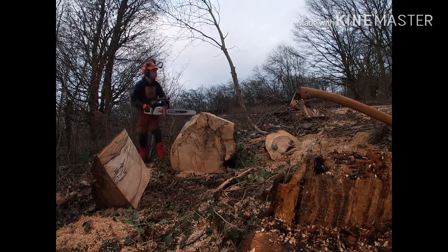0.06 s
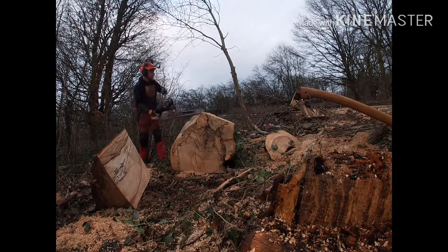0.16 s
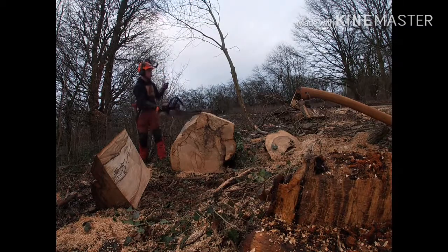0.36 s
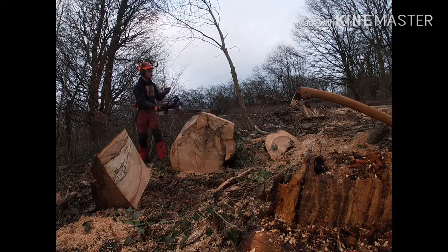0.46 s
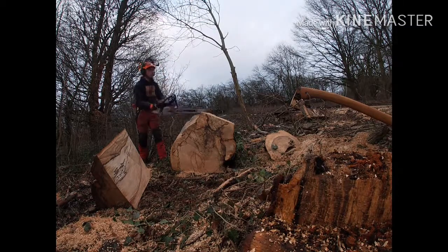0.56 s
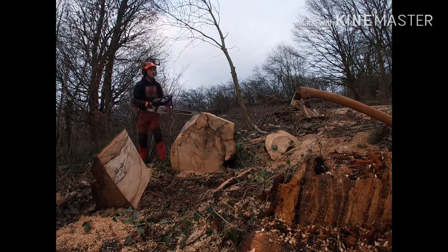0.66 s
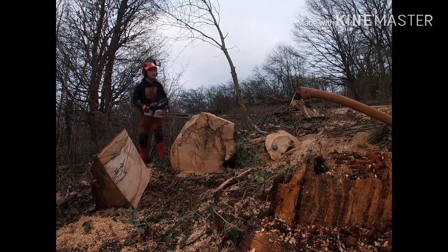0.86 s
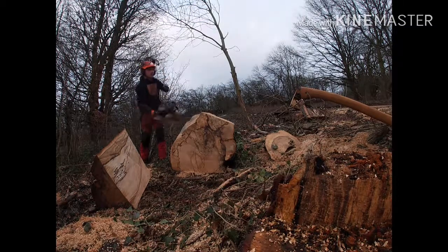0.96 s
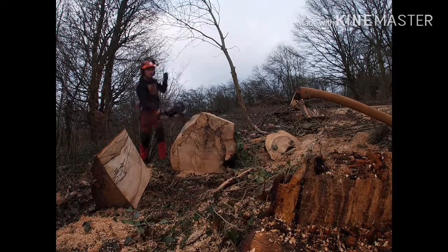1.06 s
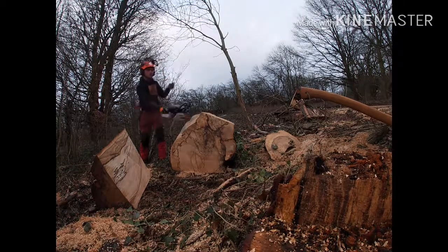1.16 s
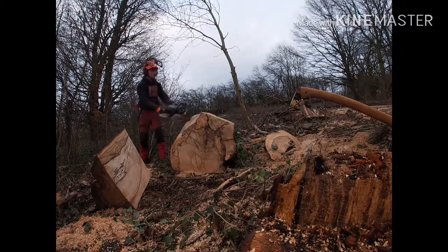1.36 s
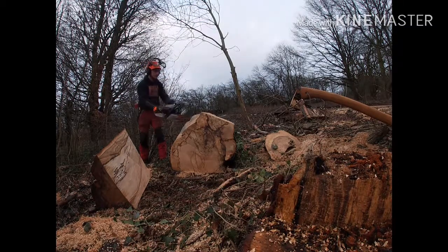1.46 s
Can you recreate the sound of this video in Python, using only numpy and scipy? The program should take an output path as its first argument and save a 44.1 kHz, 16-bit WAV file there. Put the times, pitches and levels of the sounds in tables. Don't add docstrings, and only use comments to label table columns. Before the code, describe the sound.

A cold chainsaw is pull-started twice in a woodland clearing. Light ratchet ticks come first over wind rumble and distant hush. At 0.28 s metal pawls clack, followed by about five low, airy piston chuffs and cord scrapes, then a grip knock at 0.45. Dull bumps and ticks fill 0.57-1.03. A harder pull clacks at 1.09, chuffs again, and the grip slams at 1.27; no ignition, small settling bumps.

```python
import sys
import numpy as np
from scipy import signal
from scipy.io import wavfile

SR = 44100
rng = np.random.default_rng(int(sys.argv[2]) if len(sys.argv) > 2 else 0)


def master(y):
    cut = np.clip(np.atleast_2d(y).T, -1, 1)
    pcm = np.round(cut * 32767)
    wavfile.write(sys.argv[1], SR, pcm.astype(np.int16))


def elevation(decibels):
    levels = np.asarray(decibels, float)
    return 10 ** (levels / 20)


N = 66150


def rms_one(x):
    return x / np.sqrt(np.mean(x ** 2) + 1e-20)


def curve(rows):
    return np.interp(np.arange(N) / SR, *np.transpose(rows))


def drift(rate):
    r = np.exp(-2 * np.pi * rate / SR)
    wander = signal.lfilter([1], [1, -2 * r, r * r], rng.standard_normal(N + SR))
    return rms_one(wander[SR:])


def ring(clicks, hz, t60):
    r, w = elevation(-60 / (t60 * SR)), 2 * np.pi * hz / SR
    return signal.lfilter([0, np.sin(w)], [1, -2 * r * np.cos(w), r * r], clicks + 1e-18)


def clicks_at(s, db):
    out = np.zeros(N)
    np.add.at(out, (np.asarray(s) * SR).astype(int), elevation(np.asarray(db)))
    return out


def soften(x, hz):
    r = np.exp(-2 * np.pi * hz / SR)
    return signal.lfilter([(1 - r) ** 2], [1, -2 * r, r * r], x)


def thin(x, hz):
    return signal.sosfilt(signal.butter(2, hz, "high", fs=SR, output="sos"), x)


def coloured(spectrum, patchy_db, rate):
    hz, db = np.transpose(spectrum)
    edges = hz[0] * 2 ** np.arange(0, np.log2(hz[-1] / hz[0]), 1 / 3)
    edges = np.append(edges, hz[-1])
    white = rng.standard_normal((2, N + SR // 2))
    out = 0
    for k, (low, high) in enumerate(zip(edges, edges[1:])):
        band_pass = signal.butter(3, [low, high + 1], "band", fs=SR, output="sos")
        band = signal.sosfilt(band_pass, white[k % 2])[-N:]
        band_db = np.interp(np.log(low * high) / 2, np.log(hz), db)
        out = out + band * elevation(band_db + patchy_db * drift(rate))
    return rms_one(out)


def rattle(rows, modes):
    contacts_per_s = 2500
    out, t = np.zeros(N + 4000), np.arange(4000) / SR
    for s, length, db in rows:
        swell = np.sin(np.pi * np.clip(t / length, 0, 1) ** 0.81) ** 2
        touches = swell * (rng.random(t.size) < contacts_per_s / SR)
        for hz, mode_db, t60 in modes:
            blows = soften(touches * rng.normal(0, 1, t.size), hz)
            rung = ring(blows, hz, t60)
            level = elevation(db + mode_db + rng.normal(0, 1.2))
            out[int(s * SR):][:t.size] += level * rung / (np.abs(rung).max() + 1e-12)
    return out[:N]


# [f/Hz, level/dB per Hz]
HUSH_COLOUR = [(300, 0), (420, -5), (763, 1), (1570, -5), (3730, -23.5), (6000, -36), (8000, -49),
               (14000, -74.5)]
# [t/s, level/dB]
HUSH_SWELL = [(0.0, -38), (0.324, -36), (0.458, -42), (0.71, -39), (1.09, -37), (1.5, -40.5)]
# [f/Hz, level/dB per Hz]
FIZZ_COLOUR = [(7000, 0), (9000, -1.5), (11500, -3), (13200, -7.5)]
# [t/s, level/dB]
FIZZ_SWELL = [(0, -73.5), (.3, -77.5), (.76, -82.5), (.82, -94), (1.03, -95.5), (1.1, -81), (1.38, -85),
              (1.45, -97)]


def distant_hush():
    body = elevation(curve(HUSH_SWELL) + 0.5) * coloured(HUSH_COLOUR, patchy_db=0.76, rate=18)
    fizz = elevation(curve(FIZZ_SWELL)) * coloured(FIZZ_COLOUR, patchy_db=-3, rate=30)
    return body + fizz


# [f/Hz, level/dB per Hz]
WIND_COLOUR = [(22, -15), (35, -6), (60, 1), (90, -8.5), (115, -6)]
# [t/s, level/dB]
GUST_SWELL = [(0, -36), (.11, -34.5), (.14, -31), (.17, -37), (.24, -30), (.3, -31), (.45, -40.5),
              (.53, -43), (.57, -35), (.635, -31), (.665, -35.5), (.705, -24), (.74, -36), (.9, -34.5),
              (1.05, -38), (1.2, -38), (1.35, -39.5), (1.5, -31)]
# [f/Hz, level/dB per Hz]
RUMBLE_COLOUR = [(110, -6), (140, -6), (175, 1), (216, -8), (260, -13), (320, -19)]


def wind_on_microphone():
    gusts = elevation(curve(GUST_SWELL)) * coloured(WIND_COLOUR, patchy_db=4.0, rate=9.8)
    rumble = elevation(-35) * coloured(RUMBLE_COLOUR, patchy_db=2.5, rate=4.7)
    return gusts + rumble


# [delay t/s, level/dB]
ECHO_PATHS = [
    (.012, -15.5),
    (.031, -17.5),
    (.057, -19.5),
]


def clearing_echoes(saw):
    dull = soften(saw, 2900)
    return sum(elevation(db) * np.pad(dull, (int(s * SR), 0))[:N] for s, db in ECHO_PATHS)


# [t/s, length t/s, level/dB]
TICK_EVENTS = [(.006, 0.0026, -51), (.022, 0.0034, -46.5), (.058, 0.0041, -49), (.147, 0.0061, -48.5),
               (.225, 0.0042, -47), (.606, 0.0081, -45.5), (.664, 0.0064, -51), (.697, .006, -46),
               (.727, .007, -45.5), (.765, 0.0043, -49), (1.015, .005, -55), (1.340, 0.0099, -35.5)]
# [f/Hz, level/dB, t60 t/s]
RATCHET_MODES = [(4540, -22, .015), (5260, -9, 0.03), (6040, -11, .01), (6340, -4, 0.013),
                 (6700, -17, 0.0045), (8900, -14.5, 0.0074), (11500, -30, 0.004), (14000, -29.5, .004)]


def ratchet_ticks():
    return rattle(TICK_EVENTS, RATCHET_MODES)


# [t/s, f/Hz, level/dB]
CORD_FLECKS = [(0.3225, 5600, -34.5), (0.375, 5900, -37), (.385, 3000, -27), (0.398, 3030, -28),
               (.404, 2570, -27), (.425, 2600, -36), (1.113, 2060, -44), (1.124, 2700, -24),
               (1.136, 6300, -39), (1.166, 3260, -25), (1.176, 2700, -28), (1.181, 3950, -32),
               (1.205, 2203, -34), (1.209, 1440, -21.5), (1.212, 5400, -33), (1.226, 4300, -29.5)]


def cord_flecks():
    length_s, t60_s = 0.0037, 0.013
    return sum(rattle([(s, length_s, db)], [(hz, 0, t60_s)]) for s, hz, db in CORD_FLECKS)


# [t/s, level/dB]
BODY_BUMPS = [(0.567, -9), (0.5727, -16.5), (0.6327, -14), (.655, -23.5), (.672, -29), (0.7045, -20.5),
              (.728, -18), (0.7784, -16.5), (0.813, -17.5), (.930, -20), (0.963, -13), (1.0300, -16),
              (1.283, -8), (1.3278, -10), (1.377, -25)]


def body_bumps():
    rung = ring(clicks_at(*np.transpose(BODY_BUMPS)), hz=184, t60=0.036)
    return thin(soften(rung, 320), 99)


# [t/s, length t/s, level/dB]
KNOCK_EVENTS = [
    (.4460, 0.0039, -28.5),
    (.4486, 0.0025, -15.5),
    (.480, 0.0051, -27),
    (.661, 0.013, -30),
    (1.358, 0.0088, -34),
]
# [f/Hz, level/dB, t60 t/s]
HOUSING_MODES = [(980, -10, 0.012), (1647, -6.5, 0.015), (1810, -3, 0.0096), (2065, -4, 0.024),
                 (2650, -9, .016), (3570, -13, 0.014), (3650, -34, .15), (3960, -15, .02),
                 (4980, -24, 0.018), (5170, -34, 0.16), (576, -9, 0.028)]


def housing_knocks():
    return rattle(KNOCK_EVENTS, HOUSING_MODES)


# [t/s, length t/s, level/dB]
SLAM_EVENTS = [
    (1.2685, .004, -19.5),
    (1.2722, 0.0042, -17),
]
# [f/Hz, level/dB, t60 t/s]
GRIP_MODES = [(1020, -4, 0.0216), (1560, -3, 0.017), (2170, -2, 0.019), (2730, -13.5, 0.027),
              (3540, -20, .02), (4170, -19, .015)]


def grip_slam():
    return rattle(SLAM_EVENTS, GRIP_MODES)


# [t/s, length t/s, level/dB]
CATCH_EVENTS = [
    (.2755, 0.0018, -25),
    (.2782, 0.0044, -8),
    (.2835, 0.0029, -16),
    (1.0845, 0.0064, -19.5),
    (1.0885, 0.0034, -16.5),
    (1.0920, .004, -8),
    (1.0965, 0.0038, -10.5),
    (1.106, 0.0026, -30),
    (1.122, 0.0051, -42),
]
# [f/Hz, level/dB, t60 t/s]
PAWL_MODES = [(2083, -3, 0.031), (955, -21, 0.013), (1570, -18.5, 0.018), (2350, -16.5, 0.0096),
              (2700, -15.5, 0.024), (3540, -19.5, .012), (5200, -24.5, 0.008), (6730, -37, 0.007)]


def pawl_catches():
    return rattle(CATCH_EVENTS, PAWL_MODES)


# [t/s, rise t/s, fall t/s, level/dB, brightness level/dB]
AIR_PUFFS = [(0.28, 0.0043, 0.014, -32, 3), (.300, 0.011, 0.018, -39.5, -5),
             (0.324, 0.0066, 0.0059, -42, 18), (0.343, 0.016, 0.029, -32.5, -3),
             (0.373, 0.0067, 0.0077, -40.5, 11.5), (0.394, 0.016, 0.012, -35, -10.5),
             (.432, 0.012, 0.012, -41.5, 5), (.455, 0.0016, 0.05, -41.5, -5.5),
             (1.089, 0.006, 0.026, -26.5, -0.5), (1.131, 0.0052, 0.022, -37, -1.5),
             (1.167, 0.0089, 0.011, -34, 6), (1.18, 0.01, 0.036, -37, -13),
             (1.208, 0.0054, 0.0083, -34, 14.5), (1.228, 0.008, 0.018, -41.5, 4.5),
             (1.277, 0.0049, 0.04, -44, 2), (1.345, 0.0032, 0.011, -51, 12.5),
             (1.364, 0.012, 0.018, -45.5, -16)]
# [f/Hz, level/dB per Hz]
AIR_COLOUR = [(590, -19), (1000, 7), (1600, -2), (1760, 5.5), (2680, 5.5), (4710, -12.5), (5660, -13.5),
              (10500, -27.5), (15600, -38)]


def air_hiss():
    bright_from_hz = 5000
    t = np.arange(N) / SR
    hiss = coloured(AIR_COLOUR, patchy_db=1.5, rate=150)
    hiss = rms_one(hiss * elevation(1.5 * drift(350)))
    bright = signal.sosfilt(signal.butter(4, bright_from_hz, "high", fs=SR, output="sos"), hiss)
    dull = signal.sosfilt(signal.butter(4, bright_from_hz, "low", fs=SR, output="sos"), hiss)
    dull_swell, bright_swell = 0, 0
    for s, rise, fall, db, bright_db in AIR_PUFFS:
        slope = np.where(t < s, ((s - t) / rise) ** 2, (t - s) / fall)
        puff = elevation(db) * np.exp(-slope)
        dull_swell = dull_swell + puff
        bright_swell = bright_swell + puff * elevation(bright_db)
    return dull * dull_swell + bright * bright_swell


# [t/s, low ring level/dB, high ring level/dB, lag of low ring t/ms, high ring f/Hz]
MUFFLER_POPS = [(0.3079, -6.5, -14.5, 2.8, 554), (0.313, -9.5, -8.5, 2.14, 492),
                (.3368, -22, -11.5, 2.4, 497), (0.343, -5, -11.5, 0.37, 503),
                (0.3590, -7.5, -18, 1.86, 490), (.3630, -12.5, -12.5, 3, 466),
                (0.3874, -11.5, -12.5, 0.89, 496), (0.3945, -8, -11.5, 0.53, 432),
                (0.4173, -19, -19.5, 2.5, 414), (0.4212, -6.5, -11, 3.37, 390), (1.128, -10, -11, 2.8, 505),
                (1.135, -5.5, -15, 0.27, 470), (1.1510, -19, -18, 1.1, 430), (1.1553, -9, -10, 1.9, 472),
                (1.1744, -10.5, -12.5, 1.1, 560), (1.1789, -2, -12, 0.27, 484),
                (1.1926, -12, -21, 2.2, 443), (1.1970, -13, -11, 2.6, 460), (1.2176, -31, -10, 0.41, 532),
                (1.2234, -9, -11, 0.27, 445), (0.2861, -24, -17, 3, 553), (1.1005, -13, -16, 0.88, 530),
                (1.243, -21, -23, 2.6, 406)]


def piston_pops():
    s, low_db, high_db, lag_ms, high_hz = np.transpose(MUFFLER_POPS)
    push = clicks_at(s + lag_ms * 0.00071, low_db + 1.5)
    low = ring(push, hz=169, t60=0.048)
    case = elevation(-18.5) * ring(push, hz=102, t60=0.14)
    high = sum(ring(clicks_at([a], [db]), hz, t60=0.021) for a, db, hz in zip(s, high_db, high_hz))
    return thin(soften(low + case - elevation(5.5) * high, 662), 99)


def scene():
    background = distant_hush() + wind_on_microphone()
    small_parts = ratchet_ticks() + cord_flecks() + body_bumps()
    blows = housing_knocks() + grip_slam() + pawl_catches()
    saw = small_parts + blows + air_hiss() + piston_pops()
    return (background + clearing_echoes(saw) + saw)[None]


def low_pass(x):
    return signal.sosfilt(signal.butter(12, 15710, fs=SR, output="sos"), x)


def record(dry):
    shaded_hz, shaded_width_hz, shaded_db = 5730, 500, -3
    dip_hz, dip_width_hz, dip_share = 10430, 860, 0.78
    peak = signal.lfilter(*signal.iirpeak(shaded_hz, shaded_hz / shaded_width_hz, fs=SR), dry)
    dip = signal.lfilter(*signal.iirpeak(dip_hz, dip_hz / dip_width_hz, fs=SR), dry)
    mix = dry + elevation(shaded_db) * peak - dip_share * dip
    return low_pass(mix)


dry = scene()
out = record(dry)
master(out)
```